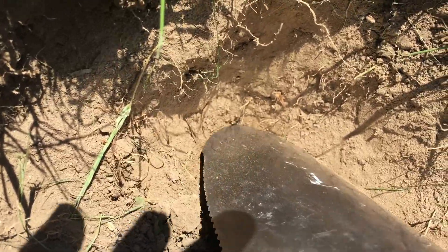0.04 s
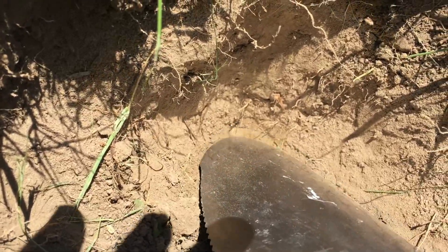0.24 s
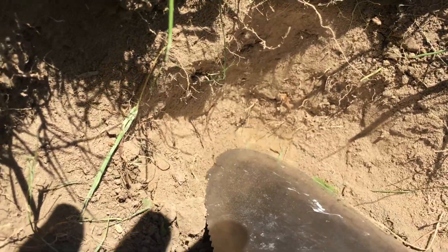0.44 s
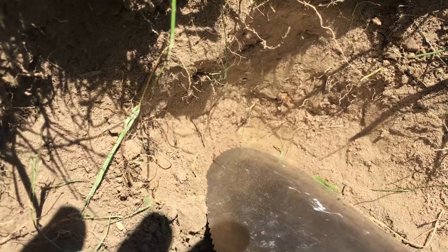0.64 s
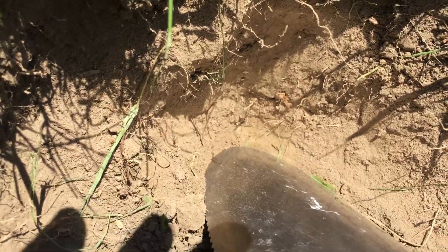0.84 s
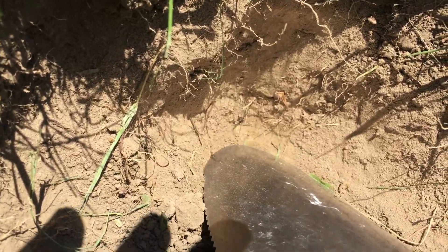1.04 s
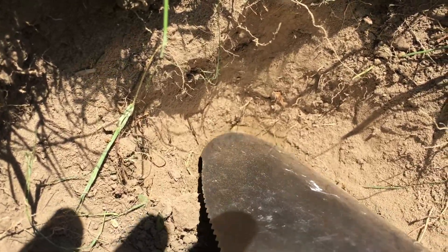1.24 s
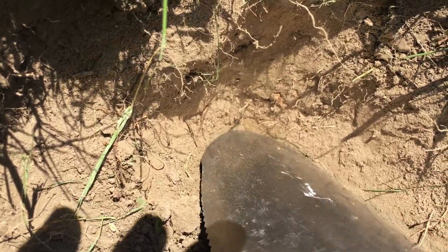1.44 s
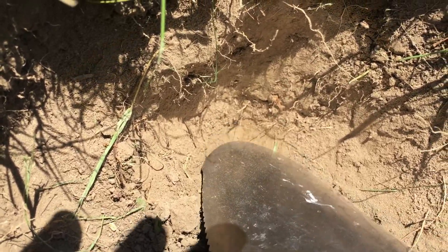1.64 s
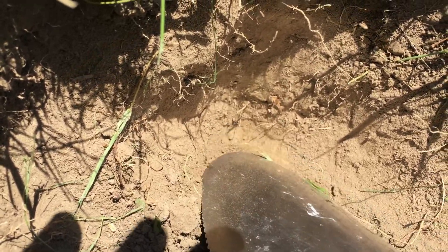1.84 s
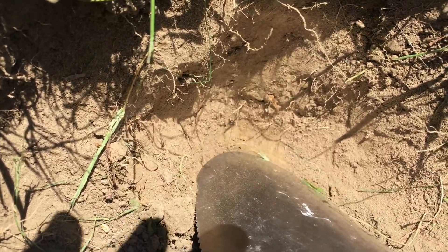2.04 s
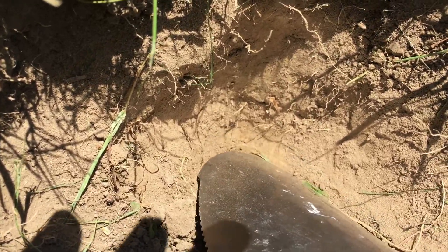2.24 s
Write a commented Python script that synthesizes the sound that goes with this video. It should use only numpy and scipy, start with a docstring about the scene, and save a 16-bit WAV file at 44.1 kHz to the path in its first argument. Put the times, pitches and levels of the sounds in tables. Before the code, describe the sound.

A steel shovel blade scrapes twice into dry, gritty soil, close by outdoors.

```python
"""Steel blade in dry soil

A digging blade is pushed twice into the dry edge of a hole, close by and outdoors. Each push is a
run of short gritty slips whose friction excites the modes of the steel, and ends in a thud on firm
soil. Grit clicks on the blade, crumbs and rootlets snap, and a low rumble lies underneath."""
import sys
import numpy as np
from scipy.fft import rfft, irfft, next_fast_len
from scipy.io import wavfile
from scipy.ndimage import map_coordinates

SR = 44100
rng = np.random.default_rng(int(sys.argv[2]) if len(sys.argv) > 2 else 0)


def dump(signal):
    """Clip the signal to [-1, 1] and save it as 16-bit WAV at the path in sys.argv[1]."""
    limited = np.clip(np.atleast_2d(signal).T, -1, 1)
    pcm = np.round(limited * 32767).astype(np.int16)
    wavfile.write(sys.argv[1], SR, pcm)


N = 105840

# Spectrum of the outdoor background: f/Hz, level/dB
RUMBLE_SPECTRUM = [(20, -46), (35, -21.5), (52, 3), (100, 5.5), (180, -4.5), (280, -14.5), (400, -26),
                   (600, -34), (1200, -27.5), (2500, -38.5), (5000, -41), (15500, -49.5)]
# Faint ticks: t/s, level/dB, f/Hz
TICKS = [(.876, -58, 3210), (0.875, -64.5, 2420), (.976, -55.5, 2774), (0.982, -62, 3215),
         (0.987, -62.5, 2360), (.988, -73, 3600), (1.169, -61.5, 3180), (1.171, -69, 2420),
         (1.378, -65, 2770), (1.992, -62, 3180)]
# Crumbs and rootlets breaking: t/s, level/dB, tilt/(dB/octave), frequency ratio to SNAP_SPECTRUM
SNAPS = [(.1238, -38, -2, .65), (0.172, -44.5, -3, .65), (1.8146, -37.5, 0, .85),
         (1.8238, -41.5, 0.5, 0.79), (1.9268, -50.5, 1.5, 1.2), (1.9361, -27.5, 2, 1.05),
         (1.9553, -21.5, -1, .92)]
# Spectrum of a snap at ratio 1: f/Hz, level/dB
SNAP_SPECTRUM = [(250, -20), (520, -9), (740, -16), (1000, -4), (2000, 1.5), (3400, -7), (4600, -20.5),
                 (7000, -18), (10000, -13.5), (15500, -26)]
# Blade meeting firm soil: t/s, level/dB
THUDS = [(0.121, -39), (0.4, -20.5), (1.746, -23)]
# Spectrum of the ground's knock: f/Hz, level/dB
THUD_SPECTRUM = [(40, -20), (110, -6), (190, 0), (340, -5.5), (480, -16), (900, -11.5), (2500, -38.5)]
# Modes of the blade, one list each: f/Hz; level/dB; width of the pitch wander/Hz
MODE_HZ = [1172, 1716, 1968, 2090, 2585, 2700, 2870, 3150, 3310, 4345, 5480, 6050, 6830, 7936, 8450, 8930,
           10120, 10900, 11500, 12100, 12525, 13950, 15200]
MODE_DB = [-17, -23, -4, -15.5, -15, -10, -15, -16, -13.5, -13.5, -19.5, -20.5, -11, -18, -24.5, -15.5, -18,
           -27, -24.5, -27, -21.5, -19, -19.5]
MODE_WIDTH_HZ = [23, 130, 50, 60, 70, 90, 130, 90, 130, 110, 140, 240, 89, 40, 99.2, 250, 80, 100, 110, 61,
                 55, 190, 200]
# Grit striking the blade: t/s, level/dB, tilt/(dB/octave)
GRIT_IMPACTS = [(0.0907, -34, 1), (0.1643, -42.5, 7), (0.1899, -43, -3), (0.3116, -28, -1.5),
                (0.3527, -12, 3), (0.3663, -24, 7.5), (0.3988, -17.5, -1.5), (0.4084, -9.5, 0),
                (0.4105, -8, -2.5), (1.442, -35, -0.5), (1.462, -35, 2), (1.5125, -37, -0.5),
                (1.6546, -48, 6.5), (1.674, -29, 4), (1.7045, -34.5, -4.5), (1.7185, -26.5, 5),
                (1.725, -25.5, 2), (1.744, -19, -0.5), (1.7572, -18.5, -3.5), (2.08, -55, 3),
                (2.09, -53, 5)]
# Spectrum of a grain's crack: f/Hz, level/dB
GRIT_SPECTRUM = [(200, -20.5), (500, -20.5), (800, -16), (1200, -8), (2000, -1.5), (2800, 0), (3400, 3),
                 (4300, -8.5), (6800, -7), (10000, -11), (15500, -24)]
# Spectrum of the crunching soil: f/Hz, level/dB
CRUNCH_SPECTRUM = [(80, -2), (200, 2), (400, 7.5), (560, -0.5), (760, -1), (980, -22.5), (1400, 9),
                   (3500, 6.5), (7000, 2.5), (15500, -5)]
# Slips: peak t/s, level/dB, 20 dB rise/s, 20 dB fall/s, tilt/(dB/octave), favoured f/Hz
SLIPS = [(0.089, -44.5, 0.0073, 0.057, 1.5, 6830), (.124, -46.5, .015, .018, 2, 6830),
         (0.207, -43, .03, .03, 1.5, 2722), (.237, -26.5, .013, 0.066, 0, 6480),
         (.315, -28.5, 0.0088, .02, 2, 2800), (.334, -24.5, .02, 0.058, 2.5, 2912),
         (.356, -21, 0.022, 0.025, -3, 7124), (.401, -30.5, 0.018, 0.026, 0.5, 5470),
         (1.255, -61, 0.01, 0.045, 0.5, 7840), (1.459, -37.5, 0.025, 0.025, 1, 2916),
         (1.514, -41, .007, .018, -0.5, 2695), (1.533, -24, .017, 0.033, 0.5, 1845),
         (1.553, -22.5, 0.038, 0.043, 1.5, 8070), (1.575, -27.5, 0.013, 0.027, 1, 6830),
         (1.673, -47, 0.0083, 0.026, 3, 2090), (1.694, -37, 0.01, 0.012, 2, 2100),
         (1.713, -39, 0.017, .015, 5.5, 2140), (1.731, -23.5, .017, 0.015, -1, 2110),
         (1.751, -19, .014, 0.024, 1, 2140), (1.822, -55, 0.014, 0.034, 2, 3310),
         (2.232, -54, 0.023, 0.061, 2, 10120), (2.383, -68, .015, 0.027, 5, 10120)]

PIVOT_HZ = 3280  # tilts of the mode levels turn about this frequency


def amp(db):
    """Amplitude ratio of a level in decibels."""
    return 10 ** (np.asarray(db) / 20)


def unit(x):
    """Normalisation to rms 1."""
    return x / np.sqrt(np.mean(x ** 2) + 1e-20)


def since(onset):
    """Seconds elapsed since the onset, zero before it."""
    return np.maximum(np.arange(N) / SR - onset, 0)


def wobble(rate):
    """Random modulation: a smooth curve with `rate` knots a second."""
    return map_coordinates(rng.standard_normal(4096), [np.arange(N) * rate / SR], mode="wrap")


def colour(x, spectrum, tilt_db=0):
    """Minimum-phase filter of unit power gain through (f/Hz, level/dB) points, tilted per octave."""
    size = 2 * next_fast_len(len(x) // 2 + 2048)
    octave = np.log2(np.fft.rfftfreq(size, 1 / SR) + 1)
    hz, db = np.transpose(spectrum)
    gain = unit(amp(np.interp(octave, np.log2(hz), db) + tilt_db * octave))
    cepstrum = irfft(np.log(gain))
    cepstrum[1:size // 2] *= 2  # folding makes the filter causal
    cepstrum[size // 2 + 1:] = 0
    return irfft(rfft(x, size) * np.exp(rfft(cepstrum)), size)[:len(x)]


def burst(onset, t60):
    """Broadband transient: noise of random sign under an exponential decay."""
    t = since(onset)
    return np.sign(rng.standard_normal(N)) * (t > 0) * amp(-60 * np.minimum(t / t60, 2))


def outdoor_rumble():
    """Filtered noise: a low rumble with faint hiss, wavering slightly in level."""
    level_db = -50 + 0.27 * wobble(1.7)
    noise = colour(rng.standard_normal(N + 4096), RUMBLE_SPECTRUM)[-N:]
    return amp(level_db) * unit(noise)


def faint_ticks(t60=0.093, rise_s=0.0045, rustle_db=-6):
    """Exponential decay: faint soft ticks, each a brief high tone with a little rustle."""
    out = np.zeros(N)
    for onset, db, hz in TICKS:
        t = since(onset)
        attack = 1 - np.exp(-t / rise_s)
        ring = np.sin(2 * np.pi * hz * t) * amp(-60 * t / t60)
        rustle = colour(burst(onset, t60), GRIT_SPECTRUM)
        out += amp(db) * attack * (ring + amp(rustle_db) * rustle)
    return out


def snaps(crack_t60=0.01, dust_t60=0.02, dust_db=-20.5):
    """Brittle fracture: crumbs and rootlets snap, bigger ones lower, with a faint tail of dust."""
    out = np.zeros(N)
    for onset, db, tilt, ratio in SNAPS:
        crack = burst(onset, crack_t60) + amp(dust_db) * burst(onset, dust_t60)
        spectrum = [(hz * ratio, level) for hz, level in SNAP_SPECTRUM]
        out += amp(db) * colour(crack, spectrum, tilt)
    return out


def soil_thuds(knock_t60=0.061, rise_s=0.0015, rebound_s=0.0084, ring_t60=0.055, ring_db=-1.5):
    """Damped impact: the ground knocks dully, then the blade springs back in its lowest mode."""
    out = np.zeros(N)
    for onset, db in THUDS:
        attack = 1 - np.exp(-since(onset) / rise_s)
        knock = colour(burst(onset, knock_t60) * attack, THUD_SPECTRUM)
        t = since(onset + rebound_s)
        ring = np.sin(2 * np.pi * MODE_HZ[0] * t) * amp(-60 * t / ring_t60)
        out += amp(db) * (knock + amp(ring_db) * ring)
    return out


def mode_ring(hz, width_hz, wander_hz=280, flutter_db=2.8, flutter_hz=400):
    """Line broadening: random modulation of pitch and level spreads a mode into a narrow band."""
    frequency = hz + width_hz / 2 * wobble(wander_hz)
    phase = 2 * np.pi * np.cumsum(frequency) / SR
    return unit(np.sin(phase) * amp(flutter_db * wobble(flutter_hz)))


def blade(envelopes, weights_db, contact_db=2.2, contact_hz=45):
    """Forced vibration: soil damps the steel so heavily that each mode follows its drive."""
    drives = np.sqrt(amp(2 * np.transpose(weights_db)) @ envelopes ** 2)  # contacts add in power
    rings = [mode_ring(hz, width) for hz, width in zip(MODE_HZ, MODE_WIDTH_HZ)]
    out = np.zeros(N)
    for db, ring, drive in zip(MODE_DB, rings, drives):
        coupling_db = contact_db * wobble(contact_hz)  # the contact moves along the edge
        out += amp(db + coupling_db) * ring * drive
    return out


def grit_impacts(crack_t60=0.017, ring_t60=0.04, ring_db=-11.5):
    """Impulsive excitation: hard grains crack against the edge and briefly ring the blade."""
    cracks = np.zeros(N)
    decays, weights_db = [], []
    for onset, db, tilt in GRIT_IMPACTS:
        t = since(onset)
        cracks += amp(db) * colour(burst(onset, crack_t60), GRIT_SPECTRUM, tilt)
        decays.append((t > 0) * amp(db - 60 * np.minimum(t / ring_t60, 2)))
        weights_db.append(tilt * np.log2(np.array(MODE_HZ) / PIVOT_HZ))
    return cracks + amp(ring_db) * blade(np.array(decays), weights_db)


def granular_friction(grains_per_s=4000, spread_db=7.5, powder_db=8.5):
    """Shot noise: impulses from grains of uneven size within the hiss of fine powder."""
    impulses = (rng.random(N) < grains_per_s / SR) * rng.choice([-1, 1], N)
    sizes = amp(spread_db * np.minimum(rng.exponential(size=N), 4))
    powder = amp(powder_db) * rng.standard_normal(N)
    return unit(unit(impulses * sizes) + powder)


def scrape(steel_db=-3.5, crunch_db=-9.5, favour_db=5.5, half_width_hz=240):
    """Stick-slip friction: slips crunch the soil and drive the blade; the bite favours nearby modes."""
    t, mode_hz = np.arange(N) / SR, np.array(MODE_HZ)
    swells, weights_db = [], []
    for peak, db, rise, fall, tilt, favoured_hz in SLIPS:
        from_peak = np.maximum((peak - t) / rise, (t - peak) / fall)
        swells.append(amp(db - 20 * np.minimum(from_peak, 10) ** 1.44))  # power 1 pointed, 2 rounded
        detuning = (mode_hz - favoured_hz) / half_width_hz
        weights_db.append(tilt * np.log2(mode_hz / PIVOT_HZ) + favour_db / (1 + detuning ** 2))
    crunch = colour(granular_friction() * np.linalg.norm(swells, axis=0), CRUNCH_SPECTRUM)
    return amp(steel_db) * blade(np.array(swells), weights_db) + amp(crunch_db) * crunch


def scene():
    """Superposition in a free field: the direct sounds add in one channel."""
    return (scrape() + grit_impacts() + snaps() + faint_ticks() + soil_thuds() + outdoor_rumble())[None]


def record(dry):
    """Band limiting: an ideal low-pass filter removes the highest treble."""
    cutoff_hz = 15900
    size = next_fast_len(N + 4096)
    passband = np.fft.rfftfreq(size, 1 / SR) < cutoff_hz
    return irfft(rfft(dry, size) * passband, size)[:, :N]


dry = scene()
out = record(dry)
dump(out)
```